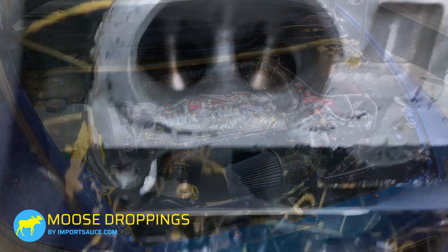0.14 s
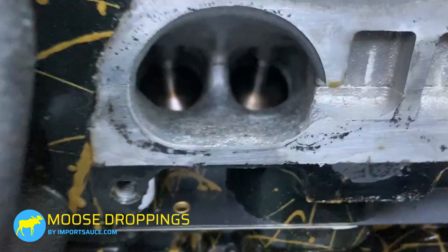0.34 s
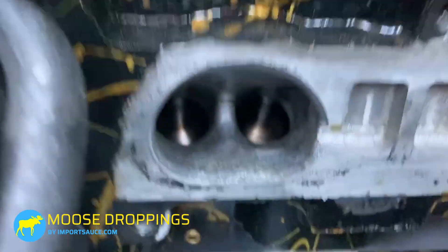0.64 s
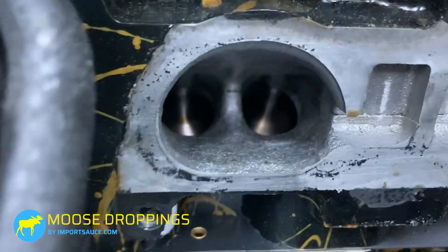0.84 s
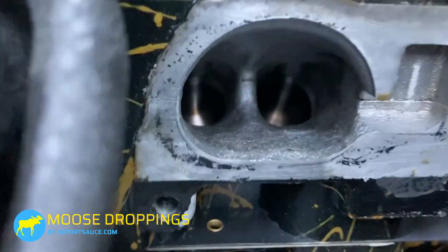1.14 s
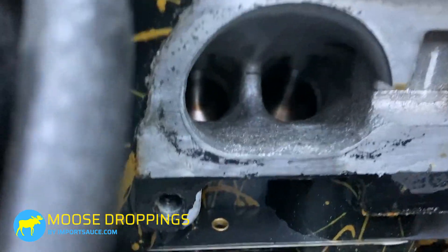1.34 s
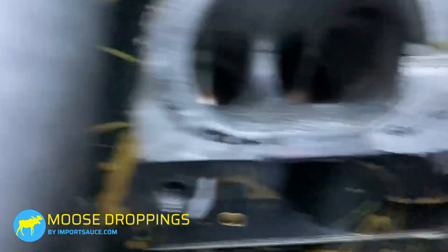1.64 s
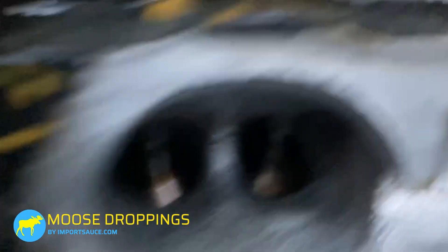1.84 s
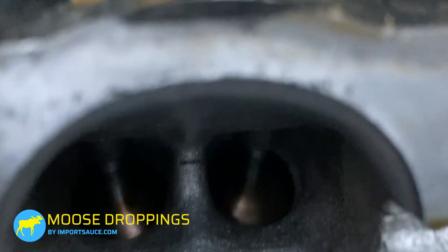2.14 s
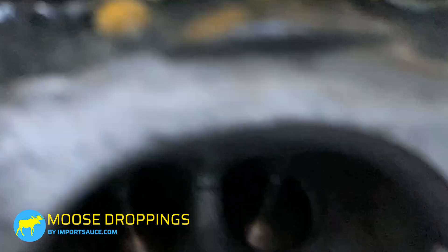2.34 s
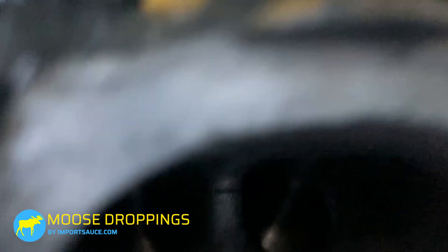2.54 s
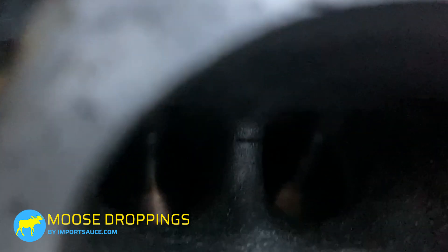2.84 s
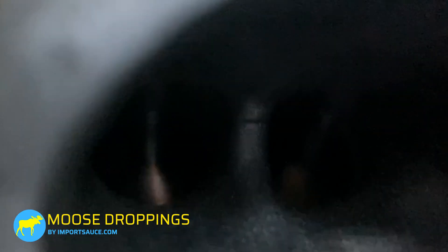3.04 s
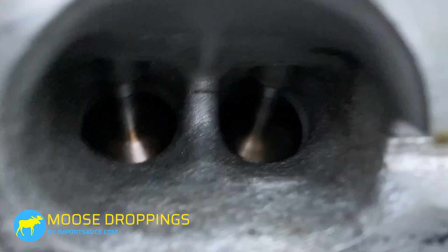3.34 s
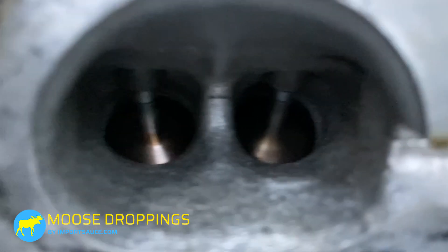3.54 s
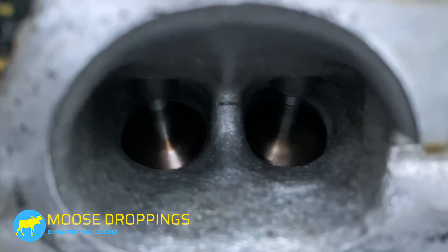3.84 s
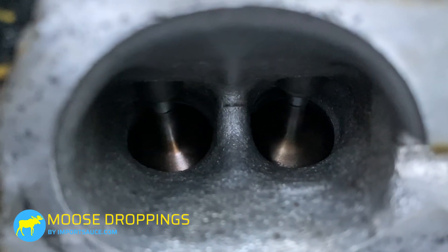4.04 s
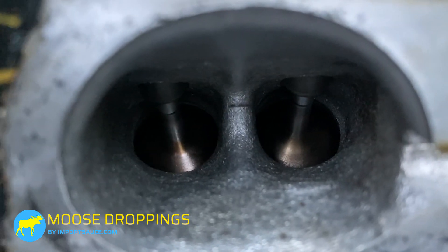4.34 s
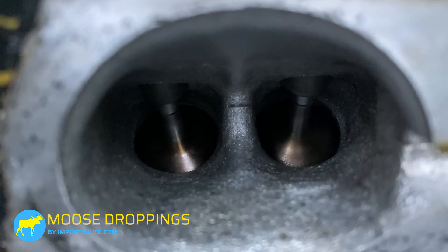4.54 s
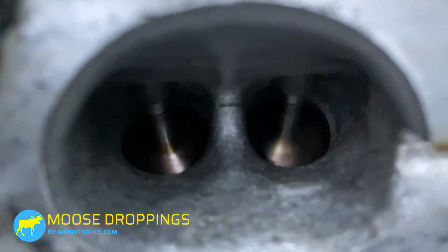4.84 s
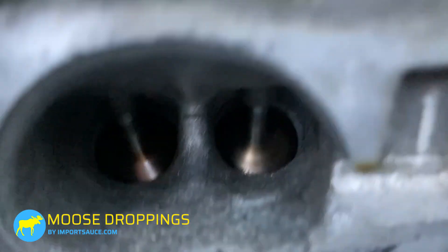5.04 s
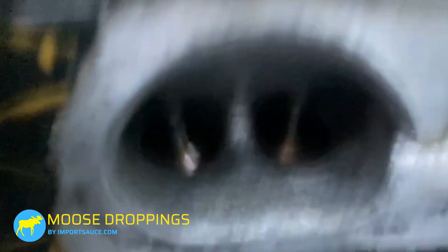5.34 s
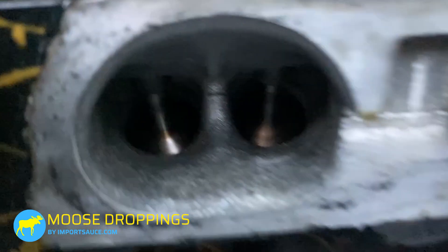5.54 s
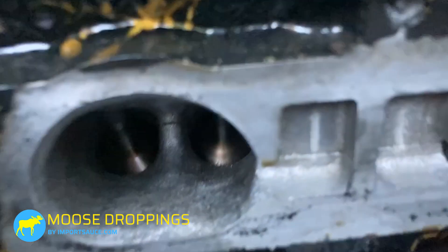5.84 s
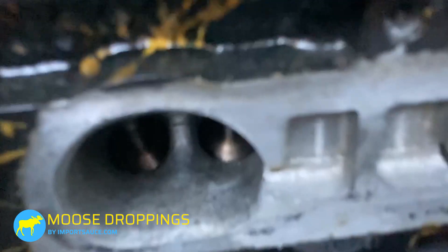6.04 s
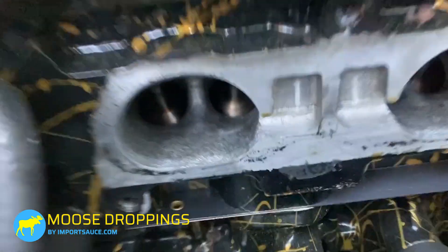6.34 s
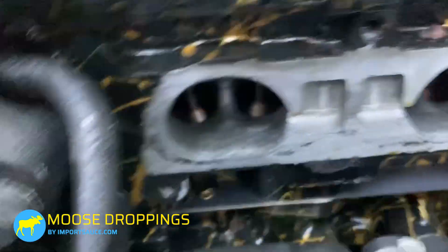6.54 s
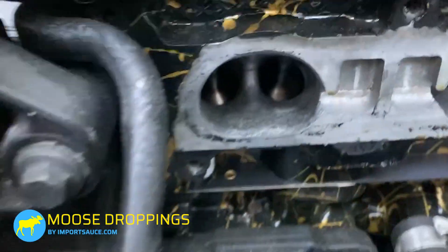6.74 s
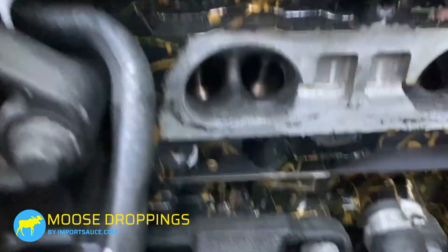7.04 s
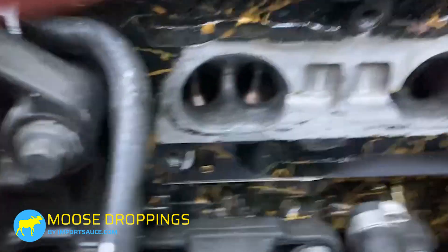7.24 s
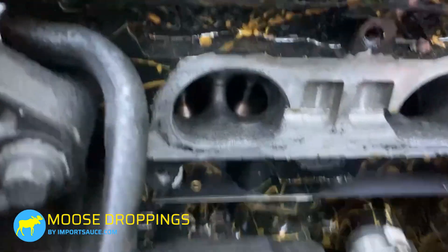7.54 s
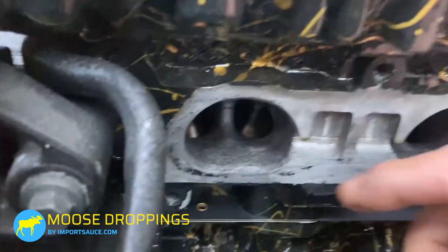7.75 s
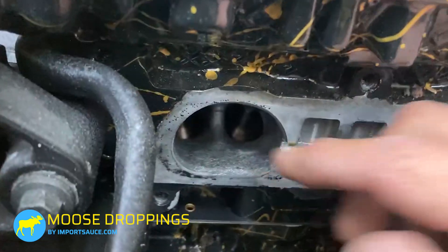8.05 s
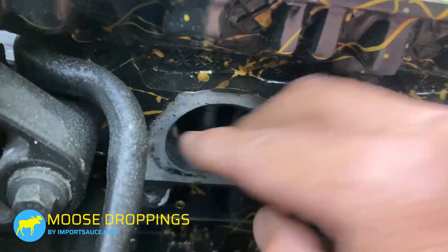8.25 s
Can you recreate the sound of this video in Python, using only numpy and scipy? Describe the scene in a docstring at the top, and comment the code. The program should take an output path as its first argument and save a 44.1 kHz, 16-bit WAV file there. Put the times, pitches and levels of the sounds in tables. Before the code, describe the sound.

A wavering airy hiss with faint whistles, close up in a garage; a hard knock early on, light handling bumps and rubs, then fading.

```python
"""A wavering hiss pours from an open port, swells, turns shrill and dwindles over a low rumble, with knocks and rubs.
Compressed air leaks past the valves of a cylinder head in a garage: noise rings in the intake port and sings in
the valve gaps. A hand-held microphone moves up to the port, lingers and draws back; it gets one sharp knock
(noise and a diving tone that ring the case) and many light ones.
Each time the hand shifts its grip, the case sways and rubs (uneven noise) and the hiss turns shriller."""
import sys
import numpy as np
from scipy import signal
from scipy.fft import rfft, irfft, next_fast_len
from scipy.io import wavfile

SR = 44100
rng = np.random.default_rng(int(sys.argv[2]) if len(sys.argv) > 2 else 0)


def inscribe(sig):
    """Save sig as 16-bit PCM at rate SR to the path in sys.argv[1].

    A 1-D sig is mono; a 2-D sig holds one channel per row.
    Samples are clipped to [-1, 1] before scaling.
    """
    pcm = np.round(np.clip(np.atleast_2d(sig).T, -1, 1) * 32767)
    wavfile.write(sys.argv[1], SR, pcm.astype(np.int16))


N = 369999
TIME = np.arange(N) / SR
FFT_SIZE = next_fast_len(N, True)
# never below 1 Hz, so that its logarithm exists
FREQS = np.maximum(np.arange(FFT_SIZE // 2 + 1) * SR / FFT_SIZE, 1)

# the hiss at the microphone's left and right openings, from afar:
# f/Hz, left lead/cycles, coherence/0-1, left minus right/dB
PAIR_FAR = [(447, 0.018, 0.53, -1), (980, 0.2, 0.85, 7), (1385, 0.27, 0.93, 6.5), (1820, 1.29, 0.96, 2),
            (2360, 1.37, 0.76, 7), (2670, 1.41, 0.84, -3.5), (3940, 1.61, 0.37, 8), (3900, 1.91, 1, -5),
            (4700, 1.64, 0.21, 3), (5150, 2.51, 0.31, -1)]
# the treble is one sound on both sides, the left a little late: from f/Hz, in phase at f/Hz, lag/s
TREBLE_PAIR = (6250, 6820, .000223)
# slow level of the two bands between rush and sizzle: t/s, middle level/dB, presence level/dB
BAND_LEVELS = [(0, -57.5, -54.5), (.9, -62, -58), (1.55, -62, -57.5), (1.85, -56, -58.5), (2.4, -55, -56.5),
               (3.1, -53.5, -54), (3.701, -55.5, -49.5), (5.2, -54.5, -54), (5.9, -54, -57),
               (6.9, -57, -55.5), (8.39, -63.5, -54.5)]
# the hand shifts its grip: start t/s, end t/s, attack/s, release/s, sway level/dB, rubbing level/dB,
# lift of the middle/dB, lift of the presence/dB
GRIPS = [(0.356, 0.602, 0.027, 0.26, -77, -59, 5, 5), (1.536, 2.414, 0.017, 0.0076, -52.5, -68, 5, 12),
         (1.88, 2.415, 0.074, 0.011, -53, -69, -3, 1.5), (5.285, 5.62, 0.026, 0.12, -56, -60, 2, 7),
         (5.99, 6.193, 0.036, 0.084, -73, -68, 2.5, 5.5)]

# distance at which the direct levels and the bounce strength below hold
REFERENCE_CM = 10
# the direct rush and sizzle fall as 1 / distance; both also fill the room evenly (dB)
RUSH_DB, RUSH_ROOM_DB, SIZZLE_DB, SIZZLE_ROOM_DB = -54.5, -54, -48.5, -67.5
# the rush takes a share of the presence's lift in dB
RUSH_LIFT_SHARE = 0.27
# the close colour gives way to the far one around this distance (cm), this steeply (power of distance)
CROSSOVER_CM, CROSSOVER_POWER = 9.4, 8.2
# bounce off the machined face: delay at zero distance (s), growth (s per cm), strength at the reference (0-1)
BOUNCE_S, BOUNCE_S_PER_CM, BOUNCE_STRENGTH = 0.000707, .000045, .16
# second standing wave: its pitch ratio and level relative to the lowest (dB); the width of both (Hz)
STANDING_RATIO, STANDING_UPPER_DB, STANDING_WIDTH_HZ = 1.125, -2, 700
HAND_RING_WIDTH_HZ, SHEEN_WIDTH_HZ = 420, 1000
WHISTLE_HZ, WHISTLE_WIDTH_HZ = 1886, 71.7
UPPER_WHISTLE_WIDTH_HZ, SHRILL_WIDTH_HZ = 150, 330
# lower whistle: direct level (dB), fall (power of distance), level in the room (dB)
WHISTLE_DB, WHISTLE_FALL_POWER, WHISTLE_ROOM_DB = -79.5, 2.77, -69
RUMBLE_DB = -57.5
# sway and rubbing of a hand held still (dB)
STILL_SWAY_DB, STILL_RUB_DB = -80, -71
# the case sways on after a grip
SWAY_RELEASE_S = 0.31
# the case snaps after contact: delay and decay (s), level over the thump (dB), pitch and width (Hz)
SNAP_DELAY_S, SNAP_S, SNAP_DB, SNAP_HZ, SNAP_WIDTH_HZ = 0.0019, 0.0006, -20, 5500, 2300
# centre and width of the scuffs' crisp edge
CRISP_HZ, CRISP_WIDTH_HZ = 2900, 2600
CUTOFF_HZ = 15800


def from_db(db):
    """Turn decibels into gain."""
    return 10 ** (np.asarray(db) / 20)


def rms_one(x):
    """Scale to an rms (average strength) of 1."""
    return x / np.sqrt(np.mean(x ** 2) + 1e-20)


def in_time(rows):
    """Draw each column of a table as a curve, sample by sample."""
    s, *columns = np.transpose(rows)
    return [np.interp(TIME, s, column) for column in columns]


def in_frequency(rows):
    """Draw each column of a spectrum, joined on a log axis."""
    hz, *columns = np.transpose(rows)
    return [np.interp(np.log(FREQS), np.log(hz), column) for column in columns]


def white():
    """Make the spectrum of fresh white noise."""
    return rfft(rng.standard_normal(FFT_SIZE))


def to_time(spectrum):
    """Make the sound that has this spectrum."""
    return irfft(spectrum, FFT_SIZE)[..., :N]


def drift(rate_hz):
    """Noise that fades out above a given rate, with rms 1: a smooth random wander."""
    return rms_one(to_time(white() / (1 + (FREQS / rate_hz) ** 2)))


def spread(mid, side, side_db):
    """Make stereo of rms 1: the middle is alike on both sides, the side signal is opposite."""
    return rms_one(mid + from_db(side_db) * side * np.array([[1], [-1]]))


def coloured(spectrum, side_db):
    """Stereo noise of a given colour, dying away above its last point; rms 1."""
    fade = 1 + (FREQS / (2 * spectrum[-1][0])) ** 2
    gain = from_db(in_frequency(spectrum)[0]) / fade
    mid, side = to_time(white() * gain), to_time(white() * gain)
    return spread(mid, side, side_db)


def breathy(hz, width_hz, side_db):
    """A narrow band of stereo noise whose pitch wanders by a tenth of its width; rms 1."""
    phase = 2 * np.pi * np.cumsum(hz + width_hz / 10 * drift(2)) / SR
    mid, side = [drift(width_hz / 2) * np.cos(phase) + drift(width_hz / 2) * np.sin(phase)
                 for _ in range(2)]
    return spread(mid, side, side_db)


def resonate(x, hz, width):
    """A two-pole resonance with gain 1 at its peak."""
    return signal.lfilter(*signal.iirpeak(hz, hz / width, fs=SR), x)


def resonant_noise(hz, width):
    """White noise sent twice through one resonance, so the band has steeper sides; rms 1."""
    once = resonate(rng.standard_normal(N), hz, width)
    return rms_one(resonate(once, hz, width))


def delayed(x, seconds):
    """Both channels, heard later by a delay that may change."""
    return np.array([np.interp(TIME - seconds, TIME, channel) for channel in x])


def held(start, end, attack_s, release_s):
    """Envelope of one grip: attack, hold, release; 0-1."""
    attack = 1 - np.exp(-np.maximum(TIME - start, 0) / attack_s)
    return attack * np.exp(-np.maximum(TIME - end, 0) / release_s)


def grip_lifts():
    """The dB that the grips add to the middle and to the presence."""
    return sum(np.outer(grip[6:], held(*grip[:4])) for grip in GRIPS)


def leak(distance_cm, flutter_db, flutter_rate_hz, sizzle_flutter_db):
    """Air rushes out of the port: colour and level change with distance, and each register flutters."""
    # air resonances of the port and the hollows between them:
    # f/Hz, width/Hz, lift close up/dB, lift from afar/dB
    port = [(941.6, 330, 19.5, 21), (1227, 300, 7.5, 9.5), (1520, 100, 6, 9), (1820, 160, -21, 2.5),
            (2140, 320, -2, 7.5), (2380, 110, -2.5, -10), (2550, 45, 6.5, 16.5), (3620, 690, -12, -1.5),
            (4244, 150, -12.5, 9), (4900, 380, -18.5, 4.5), (5810, 530, 3, 9), (6000, 110, -13, -2),
            (6490, 210, 16, 7.5), (7057, 330, 10.5, 3.5), (7240, 140, 4, 9), (8090, 103, 6.5, 6),
            (12070, 1800, 6.5, 6)]
    # the hiss at the microphone's two openings, close up:
    # f/Hz, left lead/cycles, coherence/0-1, left minus right/dB
    pair_near = [(440, 0.024, 0, 2), (810, 0.19, 1, 5), (1047, 0.5, 0.59, 7.5), (1200, 0.86, 0.24, 37),
                 (1475, 1.47, 0.68, 7), (1647, 2.33, 1, 8), (2127, 3.71, 0.75, 5), (2420, 4.54, 0.66, 1),
                 (3170, 5.32, 1, 9), (3780, 5.76, 0.5, -9), (4100, 6.1, 0.96, -5), (4690, 7.02, 0.7, -2),
                 (4730, 7.5, 1, -10), (5930, 7.5, 0.03, 7.5)]
    closeness = 1 / (1 + (distance_cm / CROSSOVER_CM) ** CROSSOVER_POWER)
    near = through_port(pair_near, [(hz, width, db) for hz, width, db, _ in port])
    far = through_port(PAIR_FAR, [(hz, width, db) for hz, width, _, db in port])
    *lower, sizzle = [(np.sqrt(closeness) * a + np.sqrt(1 - closeness) * b) * gain
                      for a, b, gain in zip(near, far, register_gains(distance_cm))]
    rush, middle, presence = [band * from_db(flutter_db * drift(flutter_rate_hz)) for band in lower]
    # only the shortest waves bounce cleanly off the machined face
    sizzle = bounced(sizzle * from_db(sizzle_flutter_db * drift(34)), distance_cm)
    # the long waves of the rush bend round the small parts that reflect the rest
    reflected = echoes_off_parts(middle + presence + sizzle + deflected(), strength=.1,
                                 nearest_s=.002, farthest_s=.011, wander_s=.00003, count=9)
    return rush + reflected


def through_port(layout, resonances):
    """The jet's noise rings in the port; one stereo signal of rms 1 for each register."""
    # borders of the four registers: rush, middle, presence, sizzle: f/Hz
    register_hz = [150, 2200, 6200, 8000, 17000]
    # broad spectrum of the jet at the valve seat: f/Hz, relative level per Hz/dB
    jet = [(180, -18), (400, -22), (800, -17), (1300, -12), (2200, -12.5), (3600, -8.5), (5200, -13.5),
           (6200, -13.5), (7700, -2)]
    # its even top end: f/Hz, relative level per Hz/dB
    top_end = [(8500, -4.5), (9600, -4), (10700, -6), (11600, -6), (12600, -5), (13600, -4), (14200, -8),
               (15500, -11)]
    lift_db = sum(db / (1 + (2 * (FREQS - hz) / width) ** 2) for hz, width, db in resonances)
    air = at_two_openings(layout) * from_db(in_frequency(jet + top_end)[0] + lift_db)
    return [rms_one(to_time(air * ((FREQS >= low) & (FREQS < high))))
            for low, high in zip(register_hz, register_hz[1:])]


def at_two_openings(layout):
    """Turbulence as the spaced pair hears it: partly shared, shifted in phase, uneven in level."""
    lead, coherence, balance_db = in_frequency(layout)
    from_hz, in_phase_hz, lag_s = TREBLE_PAIR
    treble = FREQS > from_hz
    lead = np.where(treble, (in_phase_hz - FREQS) * lag_s, lead)
    shared = np.where(treble, 1, np.clip(coherence, 0, 1))
    left = np.where(treble, 1, from_db(balance_db))
    pair = np.sqrt(shared) * white() + np.sqrt(1 - shared) * np.array([white(), white()])
    shifted_left = pair[0] * left * np.exp(2j * np.pi * lead)
    return np.array([shifted_left, pair[1]]) / np.sqrt(1 + left ** 2)


def register_gains(distance_cm):
    """Gains of rush, middle, presence, sizzle: the outer two follow distance, grips lift the rush."""
    nearness = REFERENCE_CM / distance_cm
    middle_db, presence_db = in_time(BAND_LEVELS)
    _, presence_lift_db = grip_lifts()
    rush = np.hypot(from_db(RUSH_DB) * nearness, from_db(RUSH_ROOM_DB))
    rush = rush * from_db(RUSH_LIFT_SHARE * presence_lift_db)
    sizzle = np.hypot(from_db(SIZZLE_DB) * nearness, from_db(SIZZLE_ROOM_DB))
    return rush, from_db(middle_db), from_db(presence_db), sizzle


def bounced(x, distance_cm):
    """One close echo combs the sizzle faintly; it comes later and weaker as the microphone draws back."""
    echo = delayed(x, BOUNCE_S + BOUNCE_S_PER_CM * distance_cm)
    strength = BOUNCE_STRENGTH * REFERENCE_CM / distance_cm
    return (x + strength * echo) / np.sqrt(1 + strength ** 2)


def deflected():
    """Air glancing off the hand swells the middle and presence without the port's resonances."""
    _, *bands, _ = through_port(PAIR_FAR, [])
    total = 0
    for band, level_db, lift_db in zip(bands, in_time(BAND_LEVELS), grip_lifts()):
        # the added power that makes up the lift; a negative lift adds nothing
        added = np.sqrt(np.maximum(from_db(lift_db) ** 2 - 1, 0))
        total = total + band * from_db(level_db) * added
    return total


def echoes_off_parts(x, strength, nearest_s, farthest_s, wander_s, count):
    """Weak echoes off the parts around ripple the colour; their delays wander slowly."""
    lags = rng.uniform(nearest_s, farthest_s, count)
    echoes = sum(delayed(x, lag + wander_s * drift(0.97)) for lag in lags)
    return (x + strength * echoes) / np.sqrt(1 + count * strength ** 2)


def gliding_resonances():
    """Bright bands of the hiss slide in pitch and level; the left hears them a little late."""
    # the lowest standing wave between microphone and port: t/s, f/Hz, level/dB
    standing = [(0, 8350, -53), (.6, 8800, -56), (1.1, 9100, -53), (1.65, 8700, -57), (2.0, 8350, -52),
                (2.35, 8700, -51), (2.6, 9000, -46.5), (3.05, 9080, -46), (3.32, 8400, -53),
                (3.6, 8880, -56), (5.1, 8850, -56), (5.35, 8500, -53), (5.9, 8700, -65), (8.39, 9000, -68)]
    # the hollow of the hand rings while the grip shifts: t/s, f/Hz, level/dB
    hand_ring = [(1.5, 7080, -75), (1.62, 7160, -50), (1.86, 7150, -60), (2.0, 6650, -48), (2.2, 6860, -48),
                 (2.39, 7100, -40.5), (2.48, 7400, -70), (5.25, 7840, -70), (5.46, 7240, -53),
                 (5.7, 7230, -57), (5.85, 6600, -60), (6.1, 6550, -59), (6.4, 6500, -68)]
    # a thin sheen on top of the sizzle: t/s, centre f/Hz, level/dB
    sheen = [(0, 13250, -56), (1.1, 13350, -53), (1.8, 13000, -61), (2.8, 13500, -55), (4.5, 13700, -54.5),
             (5.4, 13450, -58), (6.8, 13400, -63), (8.0, 14500, -63)]
    standing_hz, standing_db = in_time(standing)
    bands = [(standing_hz, standing_db, STANDING_WIDTH_HZ),
             (standing_hz * STANDING_RATIO, standing_db + STANDING_UPPER_DB, STANDING_WIDTH_HZ),
             (*in_time(hand_ring), HAND_RING_WIDTH_HZ),
             (*in_time(sheen), SHEEN_WIDTH_HZ)]
    right = sum(from_db(db) * breathy(hz, width, side_db=0)[0] for hz, db, width in bands)
    _, in_phase_hz, lag_s = TREBLE_PAIR
    late = np.exp(2j * np.pi * (in_phase_hz - FREQS) * lag_s)
    left = to_time(rfft(right, FFT_SIZE) * late)
    return np.array([left, right])


def singing(distance_cm, left_db):
    """Air sings in the valve gaps: turbulence feeds two faint whistles and a broader shrill band."""
    # the shrill band: t/s, centre f/Hz, level/dB
    shrill_curve = [(0, 2830, -90), (.35, 2863, -64), (.5, 2740, -52), (.9, 2820, -60.5),
                    (1.45, 2850, -55.5), (1.75, 2850, -58), (2.1, 2920, -48), (2.39, 2920, -46.5),
                    (2.48, 2640, -63), (3.1, 2685, -54), (3.5, 2782, -56.5), (5.2, 2790, -61.5),
                    (5.6, 2740, -57.5), (6.0, 2768, -54), (6.6, 2780, -59), (8.39, 2733, -56.5)]
    # the upper whistle: t/s, f/Hz, level/dB
    upper_curve = [(0, 4440, -68), (.8, 4210, -80), (1.5, 4390, -71), (1.8, 4220, -58), (2.15, 4150, -56.5),
                   (2.39, 4450, -51), (2.48, 4300, -58.5), (3.0, 4240, -58.5), (3.4, 4170, -60.5),
                   (5.0, 4210, -63), (5.4, 4280, -68), (6.2, 4260, -73), (7.0, 4266, -85),
                   (8.39, 4230, -73)]
    # the lower whistle carries only a short way
    direct = from_db(WHISTLE_DB) * (REFERENCE_CM / distance_cm) ** WHISTLE_FALL_POWER
    whistle_gain = np.hypot(direct, from_db(WHISTLE_ROOM_DB))
    shrill_hz, shrill_db = in_time(shrill_curve)
    upper_hz, upper_db = in_time(upper_curve)
    whistle = whistle_gain * breathy(WHISTLE_HZ, WHISTLE_WIDTH_HZ, side_db=3.0)
    shrill = from_db(shrill_db) * breathy(shrill_hz, SHRILL_WIDTH_HZ, side_db=3.0)
    upper = from_db(upper_db) * breathy(upper_hz, UPPER_WHISTLE_WIDTH_HZ, side_db=-2)
    return (whistle + shrill) * from_db([[left_db], [-left_db]]) + upper


def garage(waver_db):
    """The room's low rumble: wavering low noise, nearly alike on both sides."""
    # colour of the rumble: f/Hz, relative level per Hz/dB
    rumble = [(15, -32), (30, -43), (48, -4), (70, -3.5), (98, -0.5), (125, -6.5), (165, -13.5), (260, -22),
              (450, -70)]
    return from_db(RUMBLE_DB + waver_db * drift(2.5)) * coloured(rumble, side_db=-14.0)


def handling(grit_db):
    """The hand sways and rubs on the case in uneven slips, most of all while it shifts its grip."""
    # colour of the sway: f/Hz, relative level per Hz/dB
    sway_colour = [(12, -5), (30, -5), (48, 2), (80, 2), (200, -51), (500, -19.5)]
    # colour of the rubbing: f/Hz, relative level per Hz/dB
    rub_colour = [(80, -22), (170, 0), (330, 9.5), (700, -5), (1500, -6), (3000, -36), (8000, -38)]
    sway, rubbing = from_db(STILL_SWAY_DB), from_db(STILL_RUB_DB)
    for start, end, attack_s, release_s, sway_db, rub_db, _, _ in GRIPS:
        sway = np.hypot(sway, from_db(sway_db) * held(start, end, attack_s, SWAY_RELEASE_S))
        rubbing = np.hypot(rubbing, from_db(rub_db) * held(start, end, attack_s, release_s))
    slips = rms_one(coloured(rub_colour, side_db=-5) * from_db(grit_db * drift(11.6)))
    return sway * coloured(sway_colour, side_db=-8) + rubbing * slips


def knocks(rise_s, glide_cycles, rest_hz, tick_s):
    """A contact tick and snap, then a thump whose pitch dives: in the bending case the lows arrive last."""
    # knocks on the case, before it rings:
    # t/s, thump level/dB, starting pitch above the resting pitch f/Hz, decay/s, contact tick level/dB
    knock_list = [(0.452, -51, 2400, 0.0035, -52), (0.454, -43, 1310, 0.015, -41),
                  (0.511, -39, 620, 0.0061, -42), (0.596, -39, 130, 0.019, -68),
                  (0.719, -41, 230, 0.014, -70), (1.576, -12, 1710, 0.012, -32),
                  (1.663, -36, 111, 0.022, -70), (1.788, -39, 126, .035, -70),
                  (2.063, -40, 448, 0.014, -58), (2.361, -32, 580, 0.023, -64),
                  (2.389, -33, 221, 0.011, -66), (2.413, -33.5, 140, 0.018, -70),
                  (5.3262, -34, 2700, 0.0068, -39), (5.335, -44, 895, 0.0091, -46),
                  (5.351, -41, 280, .02, -49), (5.458, -52, 800, .009, -44),
                  (5.505, -40, 147.7, 0.012, -70), (5.607, -41, 1100, 0.0039, -42),
                  (6.131, -44, 610, 0.0064, -46), (8.381, -58, 3220, 0.0028, -40)]
    # colour of the contact tick: f/Hz, relative level per Hz/dB
    tick_colour = [(200, 4), (600, 6.5), (1400, 3.5), (2300, -20), (3500, -6.5), (6000, -1), (12000, -53)]
    thumps, touch, snaps = np.zeros((3, N))
    for s, thump_db, start_hz, decay_s, tick_db in knock_list:
        at = int(s * SR)
        t = TIME[:min(SR // 4, N - at)]
        here = slice(at, at + len(t))
        cycles = glide_cycles * np.log1p(start_hz * t / glide_cycles) + rest_hz * t
        swell = (1 - np.exp(-t / rise_s)) * np.exp(-t / decay_s)
        thumps[here] += from_db(thump_db) * swell * np.sin(2 * np.pi * cycles)
        touch[here] += from_db(tick_db) * np.exp(-t / tick_s)
        snap = (t > SNAP_DELAY_S) * np.exp(-np.abs(t - SNAP_DELAY_S) / SNAP_S)
        snaps[here] += from_db(thump_db + SNAP_DB) * snap
    crack = resonant_noise(SNAP_HZ, SNAP_WIDTH_HZ)
    return thumps + touch * coloured(tick_colour, side_db=9.5) + snaps * crack


def case_ring(x):
    """The microphone's case rings briefly with every knock, at its own pitches."""
    # modes of the case: f/Hz, width/Hz, level over the direct knock/dB
    modes = [(310, 63, -2), (756, 87, 6)]
    rung = x + sum(from_db(db) * resonate(x, hz, width) for hz, width, db in modes)
    # the slowest push does not reach the microphone
    return signal.sosfilt(signal.butter(1, 18, "high", fs=SR, output="sos"), rung)


def scuffs(grit_db):
    """Short, gritty brushes of skin: soft-edged bursts of dull noise with a crisp edge."""
    # light scuffs as the hand moves: t/s, level/dB, half length/s, crisp edge level/dB
    scuff_list = [(0.456, -49.5, .004, -56), (0.497, -55, 0.014, -64), (0.518, -51, .012, -64),
                  (1.6, -48, .016, -68), (5.3275, -35.5, .002, -49), (5.35, -51, .025, -63),
                  (5.465, -55, 0.011, -59), (5.611, -50, 0.004, -49), (5.835, -53, .02, -66),
                  (7.712, -57, 0.04, -62)]
    # colour of their body: f/Hz, relative level per Hz/dB
    scuff_colour = [(150, -16), (600, 0.5), (1100, -8), (2000, -6.5), (3200, -7), (5000, -32), (9000, -52)]
    body = coloured(scuff_colour, side_db=-4.0)
    edge = resonant_noise(CRISP_HZ, CRISP_WIDTH_HZ)
    strokes = 0
    for s, db, length, crisp_db in scuff_list:
        envelope = np.exp(-((TIME - s) / length) ** 2)
        strokes = strokes + (from_db(db) * body + from_db(crisp_db) * edge) * envelope
    return strokes * rms_one(from_db(grit_db * drift(200)))


def scene():
    """Leak, knocks, grip and room, added together."""
    # the microphone moves up to the port, lingers and draws back: t/s, distance/cm
    distance_curve = [(0, 10), (.5, 13.7), (.9, 14.4), (1.55, 8.7), (2.0, 5.14), (2.5, 4.13), (3.05, 3.98),
                      (3.4, 6.2), (5.1, 6.2), (5.6, 7), (6.3, 15.5), (8.39, 21)]
    distance_cm, = in_time(distance_curve)
    air = leak(distance_cm, flutter_db=1.41, flutter_rate_hz=15.0, sizzle_flutter_db=1.06)
    tones = singing(distance_cm, left_db=1.0)
    bumps = case_ring(knocks(rise_s=0.0018, glide_cycles=1.19, rest_hz=12.0, tick_s=0.0072))
    touches = bumps + scuffs(grit_db=-0.5) + handling(grit_db=6.0)
    return air + gliding_resonances() + tones + touches + garage(waver_db=3.5)


def record(dry):
    """The top is cut steeply by a low-pass filter."""
    return signal.sosfilt(signal.ellip(12, .1, 80, CUTOFF_HZ, fs=SR, output="sos"), dry)


dry = scene()
out = record(dry)
inscribe(out)
```